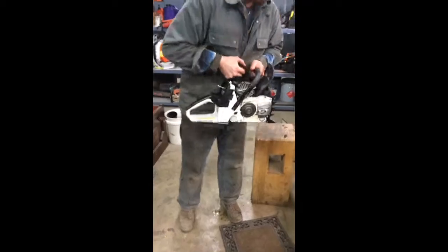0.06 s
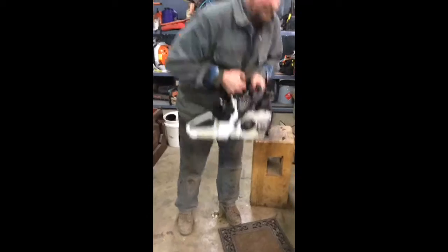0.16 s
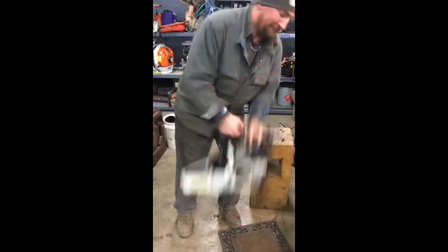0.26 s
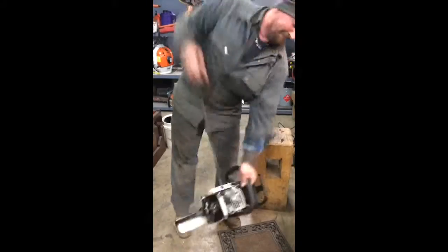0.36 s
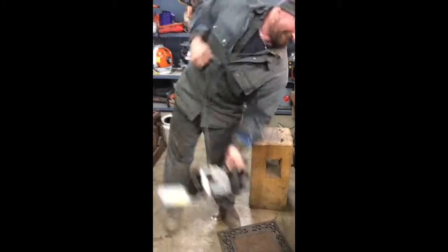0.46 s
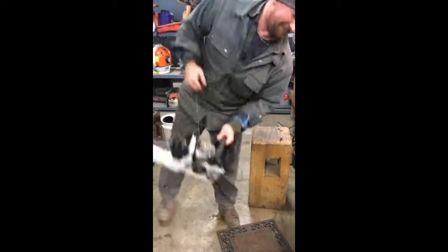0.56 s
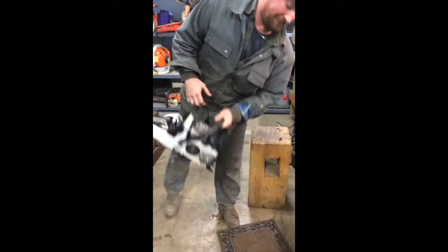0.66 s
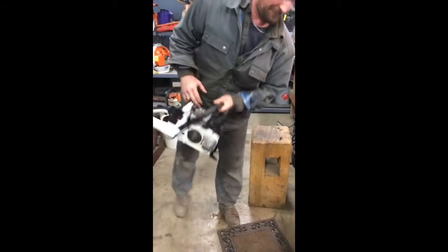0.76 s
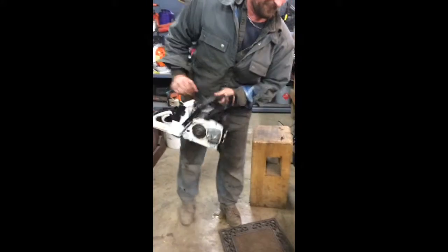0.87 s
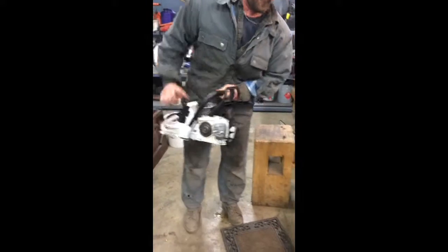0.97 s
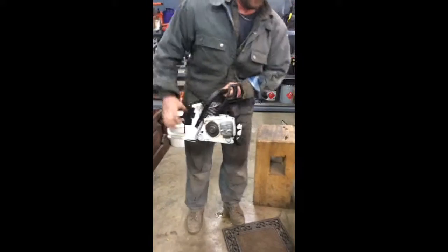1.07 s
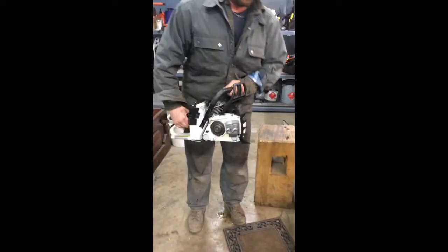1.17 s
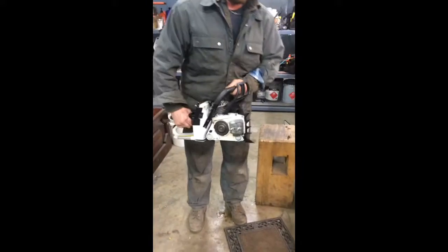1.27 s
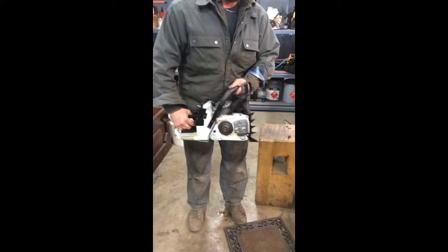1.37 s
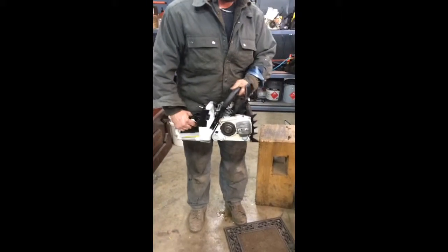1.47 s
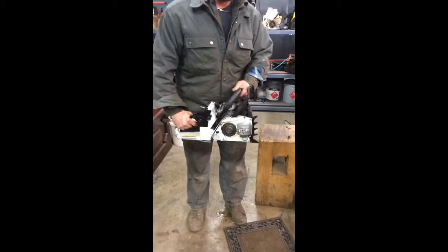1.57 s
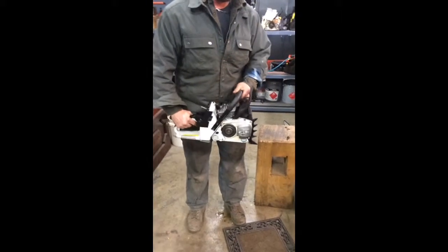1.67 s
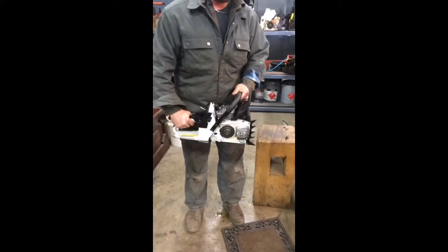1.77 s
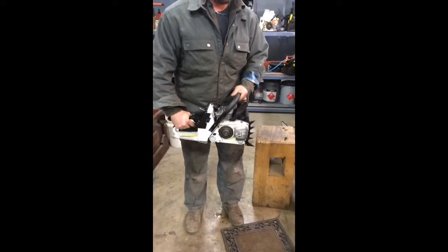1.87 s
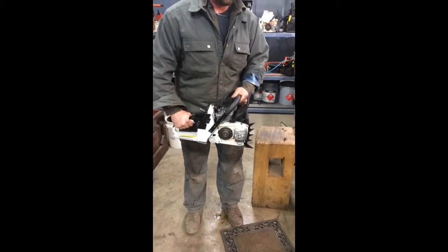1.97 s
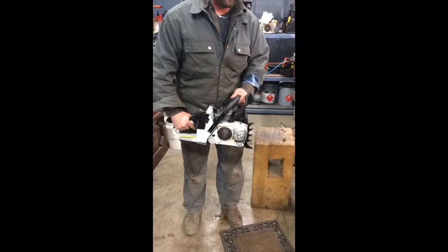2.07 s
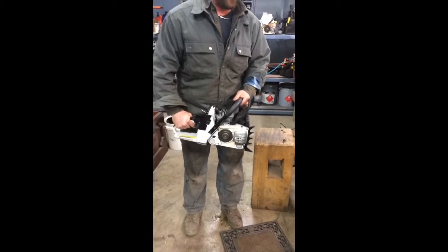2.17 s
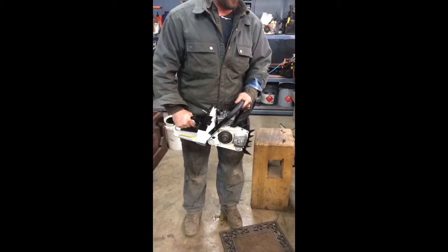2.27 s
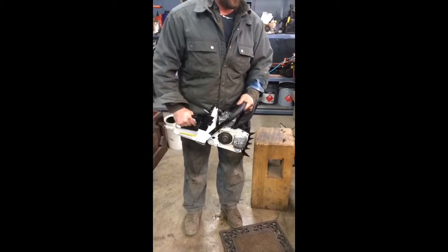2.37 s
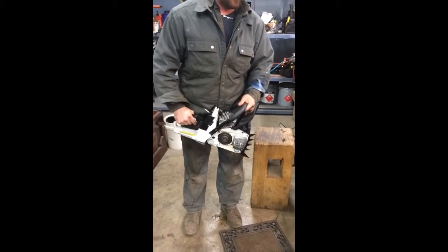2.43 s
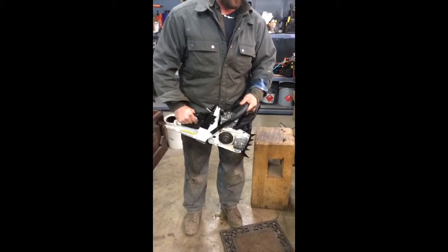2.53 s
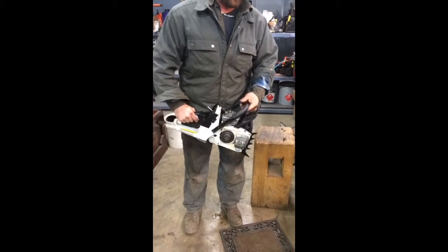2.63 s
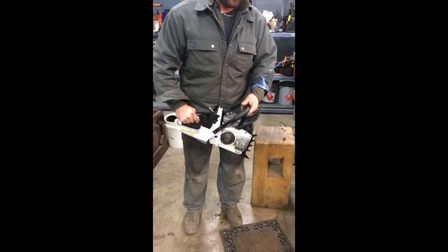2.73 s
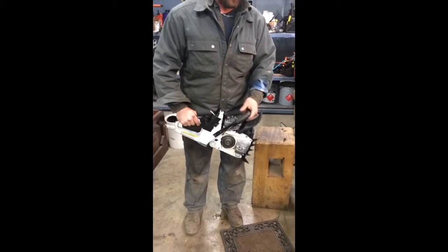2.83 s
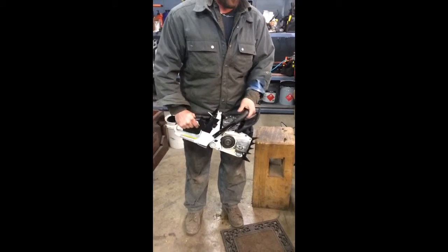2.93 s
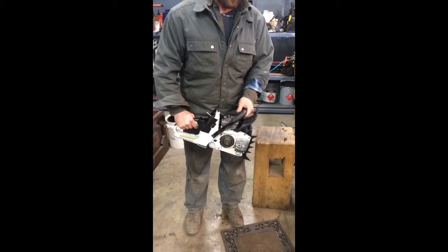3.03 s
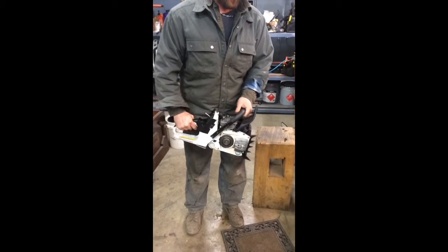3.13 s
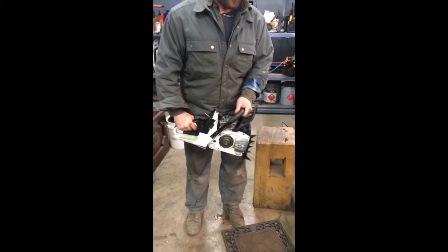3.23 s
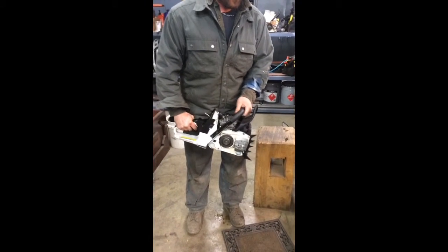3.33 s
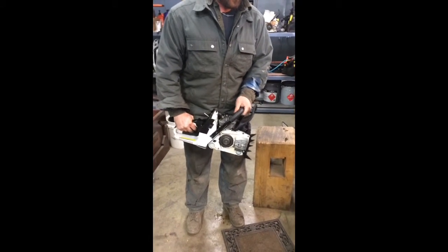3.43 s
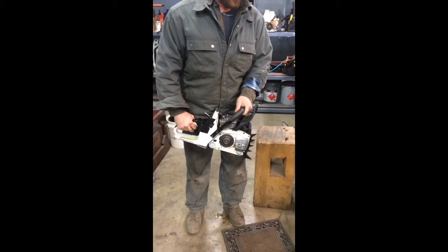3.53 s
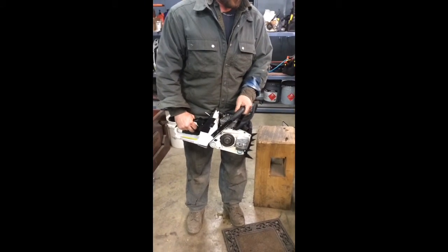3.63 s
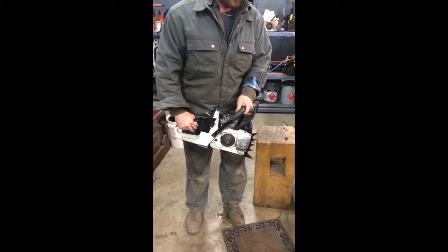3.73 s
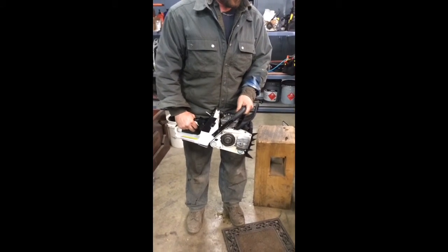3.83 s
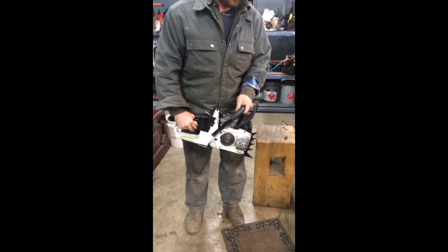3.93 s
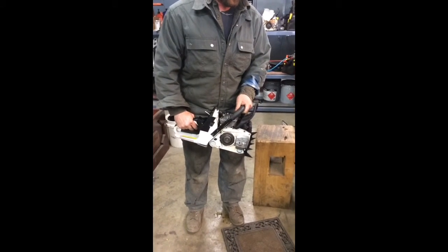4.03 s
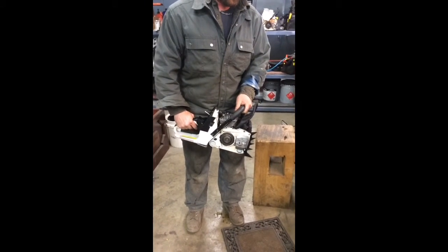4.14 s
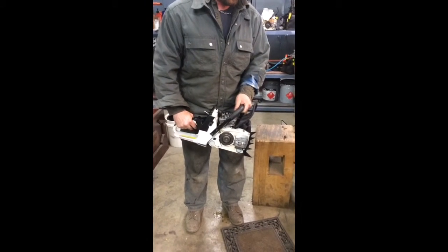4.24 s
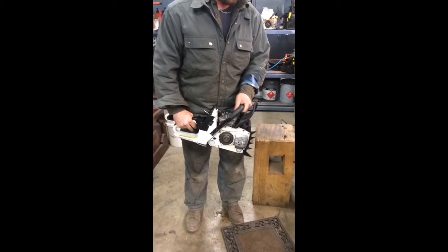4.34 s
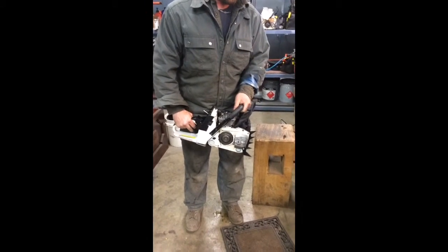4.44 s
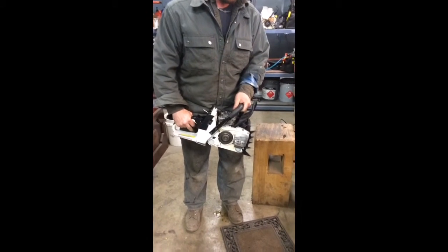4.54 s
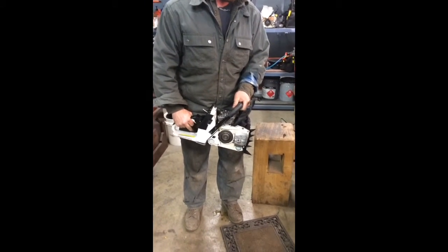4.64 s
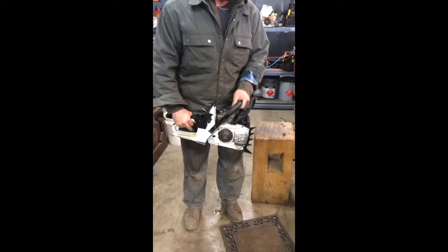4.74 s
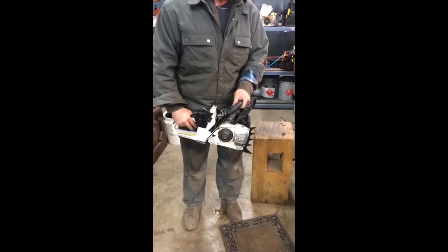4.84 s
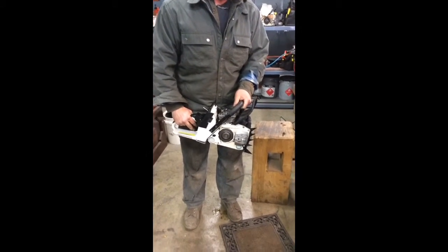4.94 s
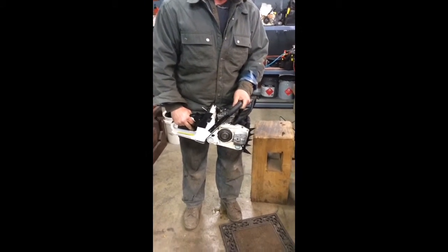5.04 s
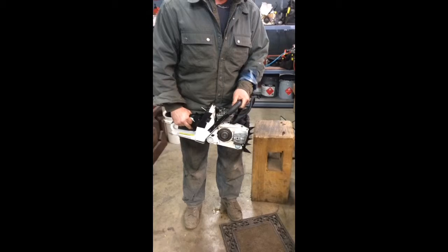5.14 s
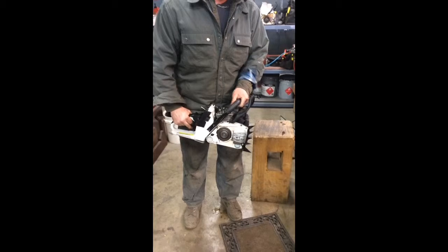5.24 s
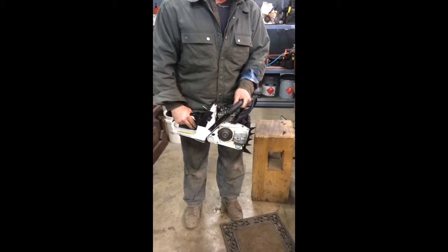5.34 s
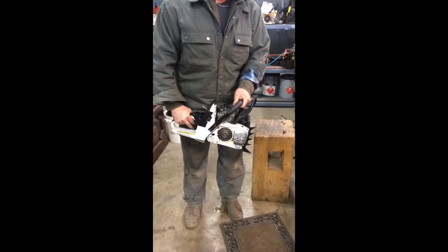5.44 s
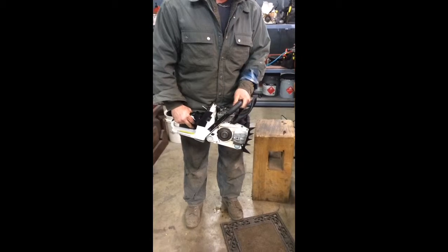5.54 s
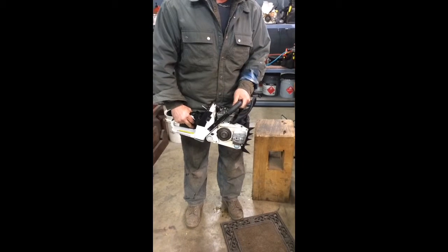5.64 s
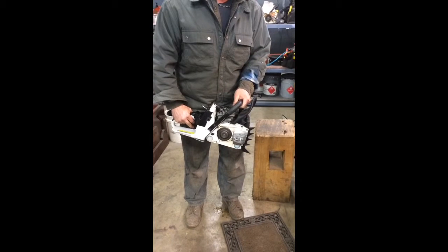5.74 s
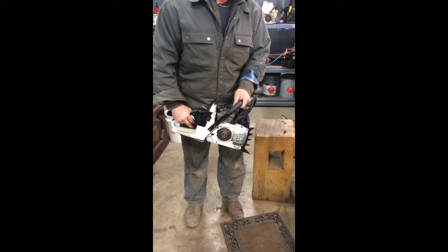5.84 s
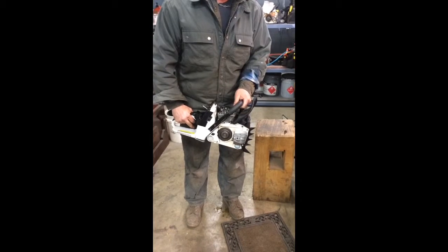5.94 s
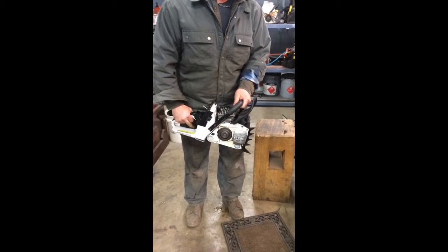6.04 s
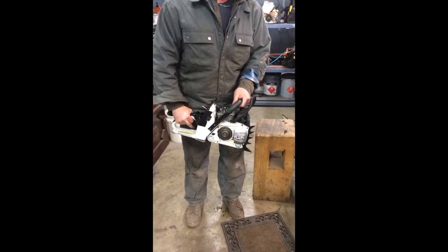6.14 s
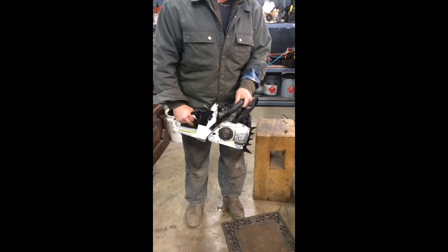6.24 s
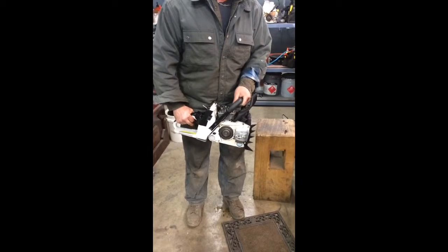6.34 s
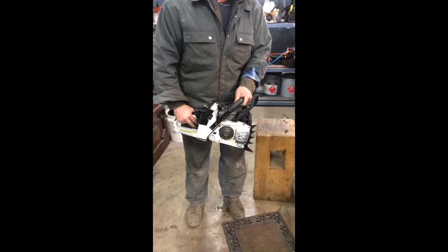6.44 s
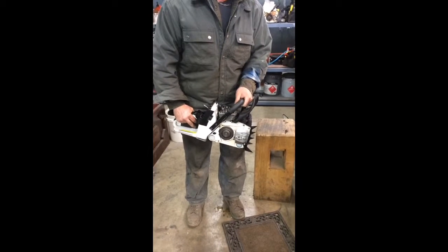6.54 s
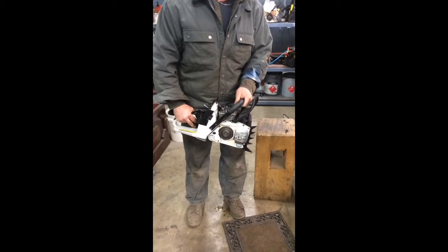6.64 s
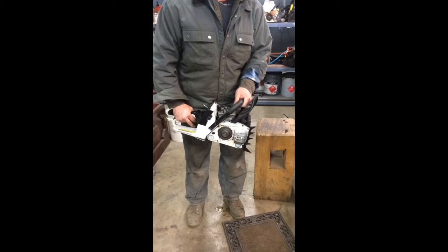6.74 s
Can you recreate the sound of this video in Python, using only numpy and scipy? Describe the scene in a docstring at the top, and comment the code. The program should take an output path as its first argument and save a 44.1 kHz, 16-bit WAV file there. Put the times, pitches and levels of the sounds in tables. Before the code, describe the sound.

A chainsaw's starter rope snaps, the small two-stroke catches and settles to a jingling idle, then screams through several short throttle blips in a workshop.

```python
"""Low workshop rumble comes first, then starter pawls snap, the rope jerks and a two-stroke chainsaw catches.
It has no bar or chain, so at idle the bare clutch drum jingles; the throttle is then blipped six times.
Crank turns time noise and pulses that puff into the muffler and shake the piston and casing.
With the throttle open the exhaust barks and the intake honks as the engine races up; shut, it coasts down.
One microphone stands close by, with the workshop walls answering; both channels carry the same sound."""
import sys
import numpy as np
from scipy import signal
from scipy.fft import rfft, irfft, next_fast_len
from scipy.io import wavfile
from scipy.ndimage import uniform_filter1d, map_coordinates

SR = 44100
rng = np.random.default_rng(int(sys.argv[2]) if len(sys.argv) > 2 else 0)


def file_out(sig):
    """Save sig as 16-bit WAV at sys.argv[1]."""
    # one column per channel
    cols = np.atleast_2d(sig).T
    # limit, then scale
    lim = np.clip(cols, -1, 1)
    pcm = np.round(lim * 32767).astype(np.int16)
    wavfile.write(sys.argv[1], SR, pcm)


N = 299880  # samples, 6.8 s


def amp(db):
    """Decibels to gain."""
    return 10 ** (np.asarray(db) / 20)


def unit(x):
    """Scaled to rms 1."""
    return x / np.sqrt(np.mean(x ** 2) + 1e-20)


def even(x, size=3000):
    """Slow swings in strength levelled to about rms 1, over windows of size samples."""
    power = uniform_filter1d(uniform_filter1d(x ** 2, size), size // 2)
    return x / np.sqrt(np.abs(power) + 1e-4 * np.mean(x ** 2))


def along(points, hz):
    """(Hz, value) points read on a log frequency axis."""
    f, value = np.transpose(points)
    return np.interp(np.log(hz + 1), np.log(f + 1), value)


def at_speed(rows, speed):
    """Each column of a table, read at the crank's speed."""
    speeds, *columns = np.transpose(rows)
    return [np.interp(speed, speeds, column) for column in columns]


def between(start, end, fade):
    """1 from start to end, with slopes of fade seconds outside."""
    return np.interp(np.arange(N) / SR, [start - fade, start, end, end + fade], [0, 1, 1, 0])


def wobble(rate):
    """A smooth random curve, rate knots a second."""
    knots = rng.standard_normal(int(N * rate / SR) + 2)
    return map_coordinates(knots, [np.arange(N) * rate / SR])


def coloured(x, spectrum, size=8192):
    """x through a causal minimum-phase filter of unit energy with this spectrum."""
    log_gain = np.log(amp(along(spectrum, np.fft.rfftfreq(size, 1 / SR))))
    cepstrum = irfft(log_gain)
    # folding the cepstrum forward puts all the response after the blow
    cepstrum[1:size // 2] *= 2
    cepstrum[size // 2 + 1:] = 0
    response = irfft(np.exp(rfft(cepstrum)))
    return signal.fftconvolve(x, response / np.linalg.norm(response))[:N]


def rung(x, modes):
    """x through a set of decaying resonances; a wider one dies sooner."""
    t = np.arange(SR // 4) / SR
    response = 0
    for hz, width, db in modes:
        decay = np.exp(-np.pi * width * t)
        response = response + amp(db) * width * decay * np.sin(2 * np.pi * hz * t)
    return signal.fftconvolve(x, response)[:N]


def gliding(x, hz, width_hz):
    """x through one resonance whose centre moves."""
    carrier = np.exp(2j * np.pi * np.cumsum(hz) / SR)
    pole = np.exp(-np.pi * width_hz / SR)
    return (carrier * signal.lfilter([1 - pole], [1, -pole], x / carrier)).real


def pulses(times, scatter_db, jitter):
    """One pulse at each time, uneven in size (dB) and timing (s), placed between samples."""
    size, shift = rng.standard_normal((len(times), 2)).T
    at = (times + jitter * shift) * SR
    taps = np.floor(at)[:, None] + np.arange(-7, 9)
    offset = taps - at[:, None]
    shape = np.sinc(offset) * np.cos(np.pi * offset / 16) ** 2
    weights = shape * amp(scatter_db * size)[:, None]
    places = np.clip(taps, 0, N - 1).astype(int)
    return np.bincount(places.ravel(), weights.ravel(), N)


def struck(times, db):
    """Single blows of given strength."""
    return np.bincount(np.round(np.asarray(times) * SR).astype(int), amp(db), N)


def bursts(blows, rise, decay):
    """Every blow releases a fresh puff of noise; rise and decay in seconds."""
    t = np.arange(SR // 8) / SR
    envelope = (1 - np.exp(-t / rise)) * np.exp(-t / decay)
    return signal.fftconvolve(blows, envelope)[:N] * rng.standard_normal(N)


# blips of the throttle: opens t/s, closes t/s, top crank speed f/Hz
THROTTLE_BLIPS = [(1.785, 1.9, 92), (1.94, 2.1, 157.5), (4.6, 4.85, 139.7), (5.1, 5.3, 201),
                  (6.06, 6.21, 160), (6.26, 6.42, 212)]
OPEN_S, SHUT_S = 0.034, 0.013  # time the throttle takes to open and to shut


def throttle():
    """0 when shut, 1 when open."""
    t = np.arange(N) / SR
    opening = np.zeros(N)
    for opens, closes, _ in THROTTLE_BLIPS:
        opening += np.interp(t, [opens, opens + OPEN_S, closes, closes + SHUT_S], [0, 1, 1, 0])
    return opening


# crank speed, trigger released; it flares on starting, then settles and hunts: t/s, turns per second f/Hz
IDLE_SPEED = [(0.33, 24), (0.4, 30), (0.47, 70), (0.6, 67.6), (0.7, 60.7), (1.0, 50.5), (1.3, 46),
              (1.78, 44.4), (3.25, 44), (3.55, 37), (3.73, 44), (4.0, 35.5), (4.3, 37), (4.6, 33)]
COAST_S, FRICTION = 1.29, 31.4  # drag time constant (s); turns per second lost each second


def crank_speed():
    """Each blip pulls the crank smoothly up to a top speed; drag and friction then slow it towards idle."""
    t = np.arange(N) / SR
    idle = np.interp(t, *np.transpose(IDLE_SPEED))
    speed = idle
    for opens, closes, top in THROTTLE_BLIPS:
        start = speed[round(opens * SR)]
        climb = start + (top - start) * np.sin(np.pi / 2 * (t - opens) / (closes - opens)) ** 2
        coast = (top + FRICTION * COAST_S) * np.exp((closes - t) / COAST_S) - FRICTION * COAST_S
        speed = np.select([t < opens, t < closes], [speed, climb], np.maximum(coast, idle))
    return speed


# single firings, mostly at idle: t/s, blow level/dB
SINGLE_FIRINGS = [(0.4218, -4), (0.455, -11), (0.9527, -7.5), (1.327, -11), (1.507, -13), (1.77, -8),
                  (1.8106, -9), (3.1782, -9), (3.244, -10.5), (3.292, -11.5), (3.4675, -7.5), (3.655, -8.5),
                  (3.7683, -6.5), (3.8367, -13.5), (3.9386, -11), (4.0225, -11), (4.1056, -11), (4.192, -5),
                  (4.2962, -10), (4.4619, -10), (4.4897, -18), (4.6143, -8.5), (4.6578, -2.5)]


def crank_angle(speed):
    """Turns made so far, eased so that every single firing falls on a whole turn."""
    t, angle = np.arange(N) / SR, np.cumsum(speed) / SR
    fired = np.transpose(SINGLE_FIRINGS)[0]
    at = np.interp(fired, t, angle)
    whole = np.cumsum(np.round(np.diff(at, prepend=0)))
    return angle + np.interp(t, fired, whole - at)


# background of the workshop: f/Hz, relative level/dB
BACKGROUND_SPECTRUM = [(18, -40), (30, -47), (69, -17), (97, -21), (881, -35), (1600, -31), (15000, -62)]


def background():
    """Steady noise of the place, strongest in the low bass."""
    return amp(-50) * coloured(rng.standard_normal(N), BACKGROUND_SPECTRUM)


# starter pawls catching and the rope jerking: t/s, snap level/dB, hollow knock level above the snap/dB
STARTER_BLOWS = [(0.23, -34.5, 4), (0.339, -9.5, -20), (0.365, -21.5, -6), (0.378, -5.5, -17)]
# snap of the pawls: f/Hz, relative level/dB
PAWL_SPECTRUM = [(200, -16), (700, -8), (1500, -12), (2300, 1), (3200, -18), (6000, -28), (15000, -39)]
# hollow knock of the plastic housing: f/Hz, relative level/dB
HOUSING_SPECTRUM = [(150, -13), (600, 2), (1000, 8), (1500, 8), (4000, -33)]
# low thump of a charge firing, also under the single firings: f/Hz, relative level/dB
THUMP_SPECTRUM = [(25, -25), (65, -18), (120, -3), (300, -7), (600, -23), (1000, -56)]


def starter():
    """The pawls snap in, the rope jerks the plastic housing and the first charge catches with a dull puff."""
    s, db, knock_db = np.transpose(STARTER_BLOWS)
    snap = coloured(bursts(struck(s, db), rise=0.0024, decay=0.0097), PAWL_SPECTRUM)
    knock = coloured(bursts(struck(s, db + knock_db), rise=.0015, decay=.004), HOUSING_SPECTRUM)
    catch = coloured(struck([.401], [8]), THUMP_SPECTRUM)
    return amp(-6) * snap + amp(10) * knock + catch


# reverberation of the workshop: f/Hz, time to die by 60 dB t/s
WALL_DECAY = [(150, 0.58), (2000, 0.25), (12000, 0.15)]


def workshop(x):
    """The walls answer 5 ms later, each frequency dying at its own speed."""
    hz, t, noise = signal.stft(rng.standard_normal(SR // 2), SR, nperseg=256)
    dying = noise * amp(-60 * t / along(WALL_DECAY, hz)[:, None])
    tail = signal.istft(dying, SR, nperseg=256)[1]
    response = np.pad(tail / np.linalg.norm(tail), (SR // 200, 0))
    return signal.fftconvolve(x, response)[:N]


# casing and cooling fins, rung by clatter and port buzz: f/Hz, width f/Hz, relative level/dB
CASING_MODES = [(1126, 12, 26), (2104, 28, 23.5), (2335, 79, 21), (3020, 140, 14.5), (3250, 80, 21.5)]
# piston rattle at idle: f/Hz, relative level/dB
SLOW_CLATTER_SPECTRUM = [(150, -30), (400, -2.5), (600, -5.5), (780, -40), (1250, -2), (1700, -5.5),
                         (2150, 8), (2650, -1.5), (3250, -4.5), (4300, -2.5), (5600, -12.5), (7500, -20),
                         (15000, -49)]
# piston rasp at speed: f/Hz, relative level/dB
FAST_CLATTER_SPECTRUM = [(250, -36), (500, -2.5), (800, -17), (1200, -4.5), (1600, -1), (2150, 6),
                         (3100, 1.5), (4200, 2), (5500, -15.5), (7300, -13.5), (9000, -24), (15000, -77)]


def clatter(turns, fast):
    """Piston slap: loose rattles at idle merge into a rasp at speed, ringing the casing."""
    slaps = pulses(turns, scatter_db=3.5, jitter=0.00062)
    drive = even(unit(bursts(slaps, rise=0.0021, decay=0.01)) + 0.27 * rng.standard_normal(N))
    rattle = np.sqrt(1 - fast) * coloured(drive, SLOW_CLATTER_SPECTRUM)
    rasp = np.sqrt(fast) * coloured(drive, FAST_CLATTER_SPECTRUM)
    ringing = amp(-4) * (1 - .5 * fast) * unit(rung(drive, CASING_MODES))
    return amp(-4.5 * fast) * even(unit(rattle + rasp) + ringing)


# ringing of the clutch drum, also shaken by single firings: f/Hz, width f/Hz, relative level/dB
DRUM_MODES = [(6895, 33, 12.5), (8800, 93, -14), (9100, 14, 0.5), (9900, 150, 11), (10760, 130, 0.5),
              (11680, 350, 5), (12960, 160, 8.5)]
# broad jingle of the clutch: f/Hz, relative level/dB
JINGLE_SPECTRUM = [(3000, -32), (5000, 8), (7000, 13), (8300, 6), (10100, 8), (10800, 10), (12200, 6),
                   (13700, 4.5), (15500, -36)]


def clutch(turns, fast):
    """The free drum is knocked once a turn; its ring fades with speed as the clutch shoes take hold."""
    blows = pulses(turns, scatter_db=5.0, jitter=0.00034)
    knocks = even(bursts(blows, rise=0.00068, decay=0.012))
    ringing = amp(3.5) * (1 - fast) * unit(rung(knocks, DRUM_MODES))
    return even(coloured(knocks, JINGLE_SPECTRUM) + ringing)


# snap of the exhaust port: f/Hz, relative level/dB
BUZZ_SPECTRUM = [(100, -58), (400, -3), (600, -34), (760, -14.5), (1130, 1.5), (1550, -14), (2100, 0.5),
                 (3000, -5), (4200, -2), (6000, -18.5)]
# the muffler's ring climbs as hot gas fills it and sinks as it cools: cool pitch, rise when hot, lag
COOL_RING_HZ, HOT_RISE_HZ, HEAT_LAG_S = 1997, 1325, 0.092
FLUTTER_HZ, FLUTTER_RATE = 55, 45  # flutter of that ring with the gas: depth (Hz), knots a second


def buzz(turns, fast, load):
    """At speed the exhaust port snaps open alike on every turn, ringing the casing and the hot muffler."""
    snaps = pulses(turns, scatter_db=1.0, jitter=.00003)
    edge = coloured(snaps, BUZZ_SPECTRUM)
    keep = np.exp(-1 / (HEAT_LAG_S * SR))
    heat = signal.lfilter([1 - keep], [1, -keep], load * fast)
    ring_hz = COOL_RING_HZ + HOT_RISE_HZ * heat + FLUTTER_HZ * wobble(FLUTTER_RATE)
    muffler_ring = even(gliding(edge, ring_hz, width_hz=80))
    casing_ring = unit(rung(edge, CASING_MODES))
    return fast * even(even(edge) + amp(7) * muffler_ring + amp(2.5) * casing_ring)


# muffler resonance: f/Hz, relative level/dB
MUFFLER_SPECTRUM = [(30, -50), (65, -18), (120, -15.5), (160, -5.5), (205, 5), (272, 2), (320, -17),
                    (430, -5.5), (620, -48), (760, -49), (1500, -57)]
# shape of one puff over the crank turn: order (multiple of crank speed), relative level/dB
PUFF_ORDERS = [(1, 0), (2, 1), (3, -2), (4, 5), (5, -6), (6, -7)]


def muffler(turns, angle, speed):
    """The piston pumps a puff into the muffler on every turn: lumpy at idle, a smoother hum above it."""
    puffs = pulses(turns + 0.00393, scatter_db=3.0, jitter=0.00084)
    lumpy = even(coloured(puffs, MUFFLER_SPECTRUM))
    hum = 0
    for order, db in PUFF_ORDERS:
        gain = amp(db + along(MUFFLER_SPECTRUM, order * speed))
        hum = hum + gain * np.sin(2 * np.pi * order * (angle - .3))
    above_idle = np.clip((speed - 41) / 14, 0, 1)
    share = above_idle * (.8 + .19 * np.clip((speed - 60) / 30, 0, 1))
    return np.sqrt(1 - share) * lumpy + np.sqrt(share) * even(hum)


# exhaust bark: f/Hz, relative level/dB
BARK_SPECTRUM = [(30, -13), (75, -6.5), (130, -4.5), (330, -3), (530, 0.5), (700, -4), (930, -2.5),
                 (1200, -9), (2500, -21), (6000, -42)]


def bark(turns):
    """Under throttle the charge fires hard and unevenly, with a rush of gas behind each shot."""
    shots = pulses(turns, scatter_db=1.6, jitter=.00006)
    gas = bursts(shots, rise=.0005, decay=.005)
    roar = coloured(unit(shots) + .6 * unit(gas), BARK_SPECTRUM)
    return even(roar + .6 * workshop(roar), size=1500)


# bark as the engine catches: start t/s, starting level/dB, fall a second/dB
START_FLARE = (0.42, -24, 29)


def flare():
    """Strength of the bark as the engine catches, dying away steadily."""
    start, db, fall_db_per_s = START_FLARE
    age = np.arange(N) / SR - start
    return (age > 0) * amp(db - fall_db_per_s * np.abs(age))


# pop of a single firing: f/Hz, relative level/dB
POP_SPECTRUM = [(200, 6.5), (550, -3.5), (800, -27), (1600, -6), (2250, 11), (3500, 4.5), (5500, -7),
                (10000, -7.5), (15000, -40)]


def firings():
    """Single charges fire, each with a sharp pop and a low thump that shakes the clutch drum."""
    s, db = np.transpose(SINGLE_FIRINGS)
    blows = struck(s, db)
    pop = coloured(bursts(blows, rise=0.0021, decay=0.0049), POP_SPECTRUM)
    thump = coloured(blows, THUMP_SPECTRUM)
    shaken = rung(bursts(blows, rise=0.016, decay=0.035), DRUM_MODES)
    return amp(2.5) * pop + amp(5.5) * thump + amp(-40.5) * unit(shaken)


# whine of the ports: order (multiple of crank speed), relative level/dB
WHINE_ORDERS = [(2, -4), (3, -7), (4, -11), (5, -5), (6, 0), (7, -1)]


def whine(angle, speed):
    """Gas chopped by the ports sings on a few clean crank orders at speed, each drifting in strength."""
    orders = 0
    for order, db in WHINE_ORDERS:
        orders = orders + amp(db + 3 * wobble(15)) * np.cos(2 * np.pi * order * angle)
    strength = np.interp(speed, [55, 75, 100, 135, 175], [0, .45, .4, .35, 1])
    return amp(-11) * strength * orders


# airbox resonance: f/Hz, relative level/dB
AIRBOX_SPECTRUM = [(35, -25), (80, -5.5), (140, -6.5), (195, 5.5), (260, -3), (340, -20.5), (700, -28.5)]


def intake(turns):
    """The open carburettor gulps air once a turn and the airbox honks."""
    gulps = pulses(turns, scatter_db=0.0, jitter=0.0001)
    return even(coloured(gulps, AIRBOX_SPECTRUM), size=1500)


# balance by crank speed; hum swells where a crank order meets the muffler's resonance:
# turns per second f/Hz, then relative level/dB of muffler hum, casing clatter, port buzz, clutch jingle
LEVELS_BY_SPEED = [(32, -26, -26, -27, -44.5), (39.6, -25, -24.5, -26, -34.5), (44.6, -25.5, -24, -7, -27),
                   (54.4, -18.5, -23.5, -23, -30.5), (70.5, -26.5, -23.5, -19.5, -38.5),
                   (95.6, -26.5, -24.5, -20, -39.5), (113.6, -21.5, -18.5, -17, -36.5),
                   (130, -17, -17, -20.5, -32.5), (150.4, -32, -15, -17, -32),
                   (179, -25.5, -15.5, -16.5, -29.5), (198, -21.5, -15, -19, -31.5)]
# balance with the throttle open: turns per second f/Hz, relative level/dB of exhaust bark, intake honk
LEVELS_UNDER_LOAD = [(44.7, -32.5, -26.5), (73.6, -22.5, -15), (104, -16.5, -27), (149, -22.5, -20),
                     (202, -25, -13.5)]
LOAD_CLATTER_DB, LOAD_JINGLE_DB = 1.5, 3  # added by an open throttle
COLD_HUM_DB, COLD_CLATTER_DB, COLD_JINGLE_DB = 4, 2.5, 1.5  # added on fast idle, until the first blip


def scene():
    """The crank times every part of the engine; its speed and the throttle set how loud each is."""
    speed, load = crank_speed(), throttle()
    angle = crank_angle(speed)
    turns = np.interp(np.arange(1, int(angle[-1]) + 1), angle, np.arange(N) / SR)  # time of each turn (s)
    fast = np.clip((speed - 48) / 70, 0, 1)
    cold = between(0, THROTTLE_BLIPS[0][0], fade=.1)
    running = between(0.395, N / SR, fade=0.042)
    puffing = between(.402, N / SR, fade=.004)
    hum_db, clatter_db, buzz_db, jingle_db = at_speed(LEVELS_BY_SPEED, speed)
    bark_db, honk_db = at_speed(LEVELS_UNDER_LOAD, speed)

    floor = background()
    pull = starter()
    casing = amp(clatter_db + COLD_CLATTER_DB * cold + LOAD_CLATTER_DB * load) * clatter(turns, fast)
    drum = amp(jingle_db + COLD_JINGLE_DB * cold + LOAD_JINGLE_DB * load) * clutch(turns, fast)
    rattles = amp(1.5) * running * (casing + drum) + firings()

    hum = puffing * amp(hum_db + COLD_HUM_DB * cold) * muffler(turns, angle, speed)
    port_sound = amp(-1.5) * buzz(turns, fast, load) + amp(0.5) * whine(angle, speed)
    ports = running * amp(buzz_db) * port_sound
    barking = (load * amp(bark_db) + flare()) * bark(turns)
    honk = load * amp(honk_db) * intake(turns)
    exhaust = amp(-2.5) * hum + ports + amp(2.0) * barking + honk

    room = workshop(amp(-12) * (exhaust + pull) + amp(-6) * rattles)
    mono = exhaust + rattles + pull + room + floor
    return np.array([mono, mono])


TOP_HZ = 15600  # band limit of the recorder


def record(dry):
    """The recorder rounds the highest peaks, sheds the deepest bass and keeps nothing above its band limit."""
    rounded = dry / (1 + np.abs(dry / .74) ** 10) ** (1 / 10)
    bass_cut = signal.butter(2, 42, "highpass", fs=SR, output="sos")
    thinned = signal.sosfilt(bass_cut, rounded)
    size = next_fast_len(N + SR // 4)
    kept = np.fft.rfftfreq(size, 1 / SR) < TOP_HZ
    return irfft(rfft(thinned, size) * kept, size)[:, :N]


dry = scene()
out = record(dry)
file_out(out)
```